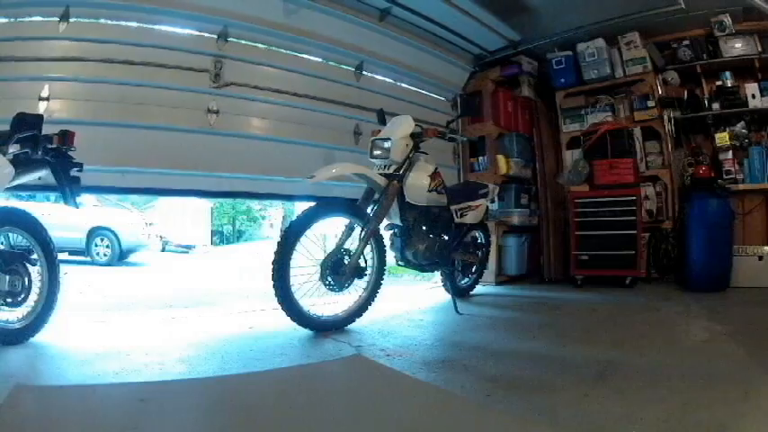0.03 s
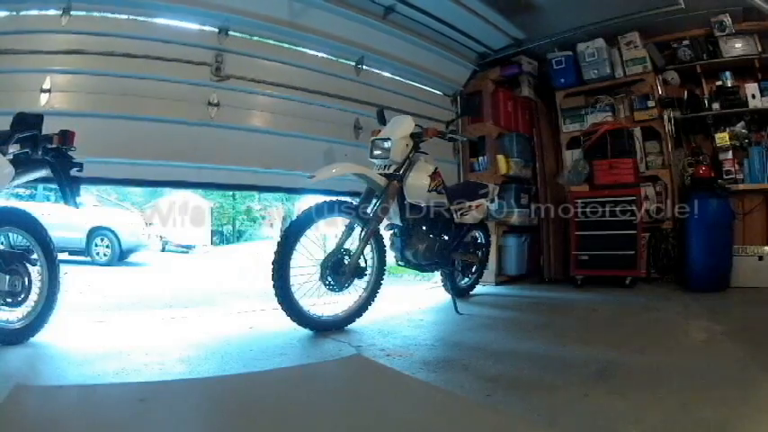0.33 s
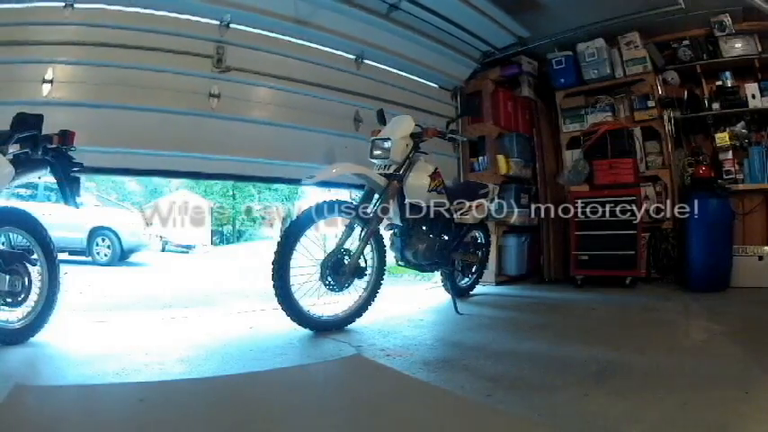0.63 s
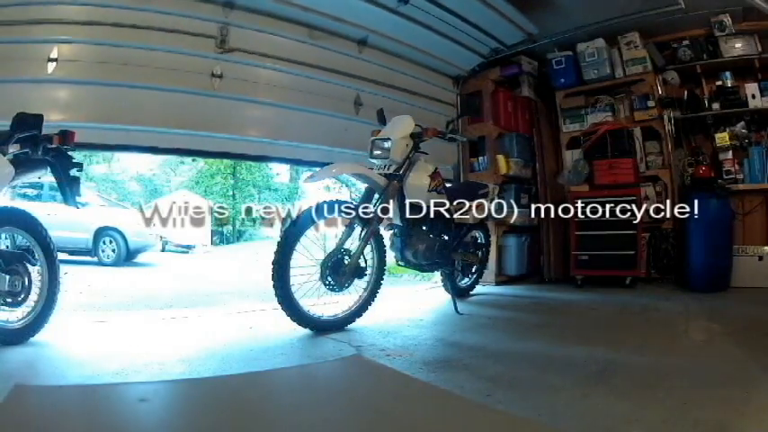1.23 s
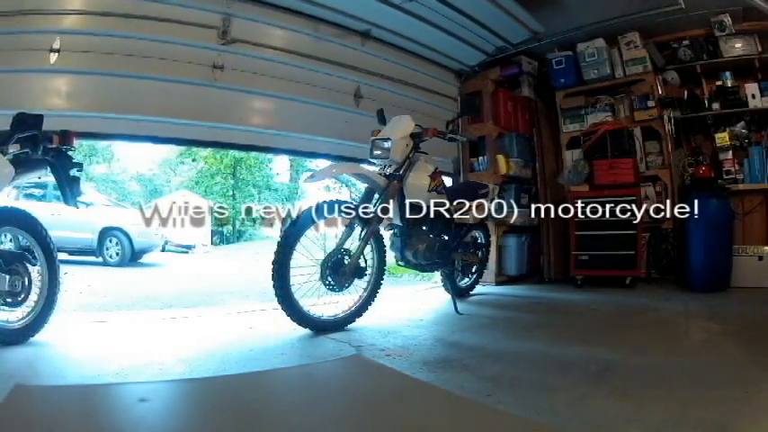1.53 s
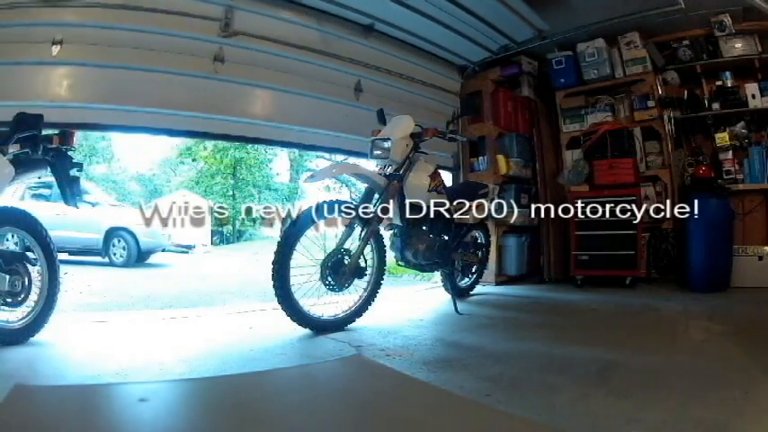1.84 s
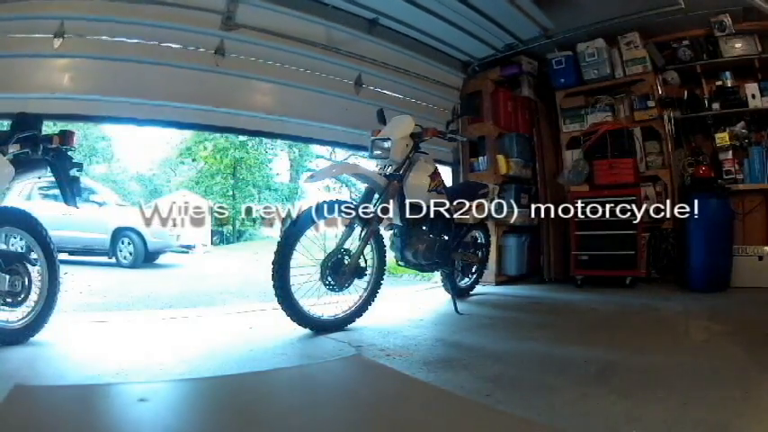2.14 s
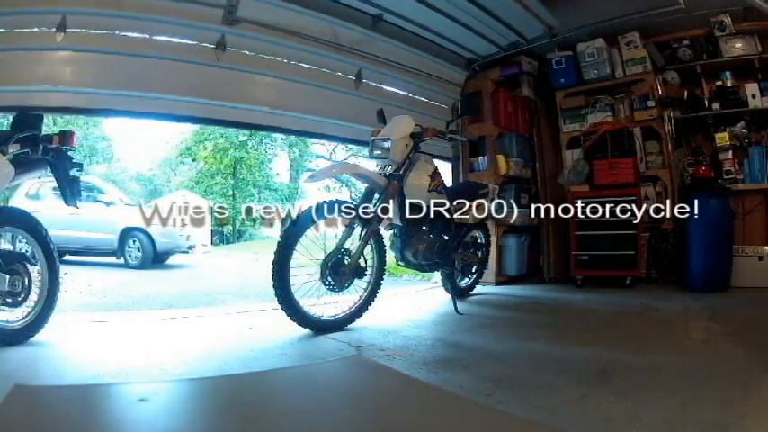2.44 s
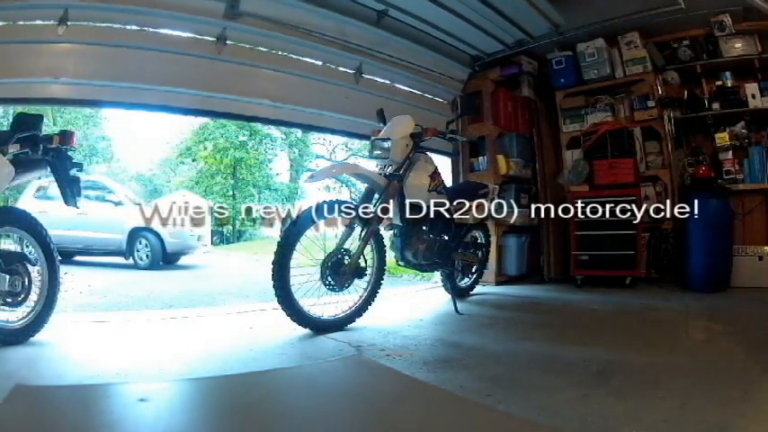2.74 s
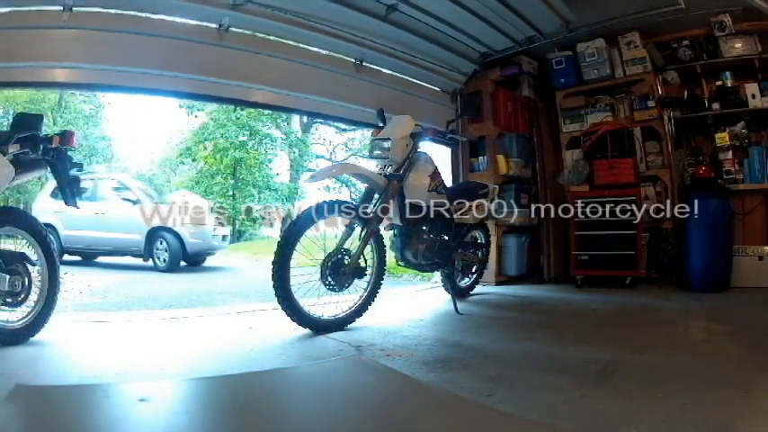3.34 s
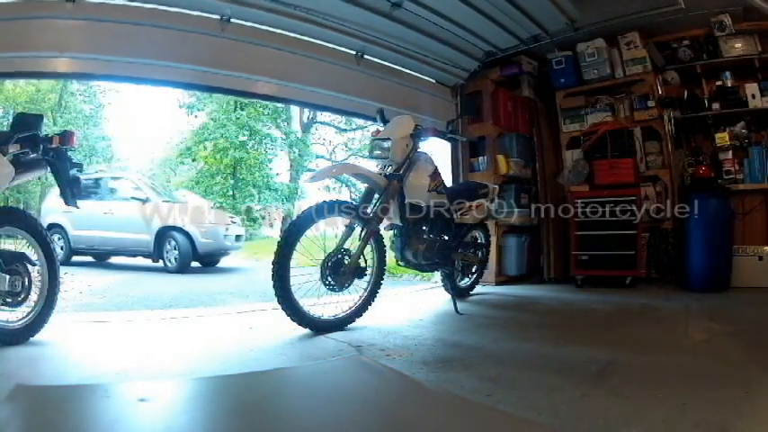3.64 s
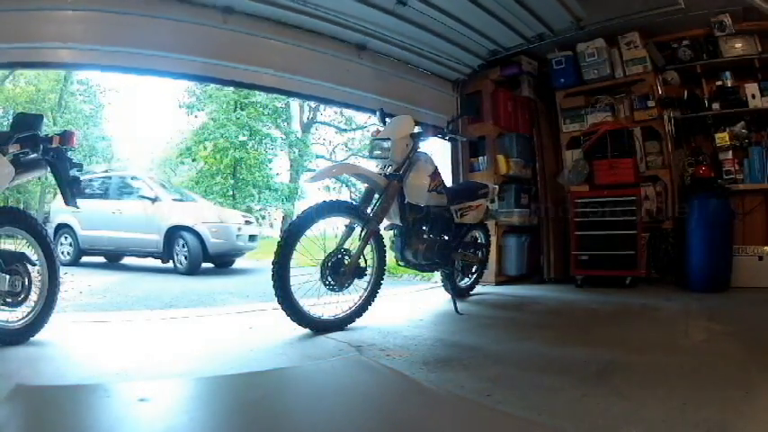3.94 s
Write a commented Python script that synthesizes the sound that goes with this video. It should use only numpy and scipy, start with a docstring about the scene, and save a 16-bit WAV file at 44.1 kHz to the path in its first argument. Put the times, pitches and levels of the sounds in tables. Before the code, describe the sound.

A motorized garage door rises for the whole four seconds, heard from inside with a short echo. The motor hums under rumbling panels and light chain chatter. Loose metal parts rattle on and off, most strongly between about 0.3 and 1.4 seconds. Near 2.8 seconds a dry roller scrapes upward in pitch into a brief squeak. From about 3.2 seconds the track rings faintly on one wavering tone.

```python
"""A garage door opening

An electric opener lifts a sectional door, heard from inside the garage. The motor hums at
twice the mains frequency and the rollers rumble through the panels. Hinges and track rattle,
one dry roller squeaks, and near the top the track sings. A low, held sample rate mirrors
the sound faintly into the treble."""
import sys
import numpy as np
from scipy import signal
from scipy.fft import rfft, irfft
from scipy.io import wavfile

SR = 44100
rng = np.random.default_rng(int(sys.argv[2]) if len(sys.argv) > 2 else 0)


def unload_audio(sound):
    """Save the sound as a 16-bit wav file, at the path given as the first command line argument."""
    columns = np.transpose(np.atleast_2d(sound))
    # keep every value between -1 and 1, then stretch to whole-number steps
    steps = np.round(np.clip(columns, -1, 1) * 32767)
    wavfile.write(sys.argv[1], SR, steps.astype(np.int16))


N = 176400
T = np.arange(N) / SR

HUM_HZ = 120.1  # twice the mains frequency
# How the hum's harmonics at 1, 2 and 4 times its pitch rise and fall: t/s, level/dB
FIRST_HARMONIC = [(0, -36.5), (.3, -35.5), (.42, -38), (.6, -33), (.82, -42), (1.0, -39), (1.1, -47),
                  (1.4, -48.5), (1.9, -46.5), (2.2, -49), (2.42, -38), (2.7, -59), (2.94, -34), (3.05, -55),
                  (3.2, -38), (3.6, -47), (4, -60)]
SECOND_HARMONIC = [(0, -56), (.5, -52.5), (.75, -46), (1.3, -50.5), (2.3, -54), (2.9, -49), (3.5, -48),
                   (4, -51)]
FOURTH_HARMONIC = [(0, -41.5), (.3, -42), (.42, -51), (.58, -52), (.68, -42), (.82, -48), (1.1, -51.5),
                   (1.27, -42), (1.62, -50), (2.03, -43.5), (2.22, -51.5), (2.4, -43.5), (2.62, -45.5),
                   (2.9, -50), (3.28, -48), (3.5, -49.5), (4, -49)]
# The level near 360 Hz, the hum's third harmonic plus a brief panel ring near 2.9 s: t/s, level/dB
LEVEL_NEAR_360_HZ = [(0, -40), (.35, -37.5), (.42, -43.5), (.55, -74), (.7, -41.5), (.88, -42), (.98, -39),
                     (1.15, -43.5), (1.36, -46), (1.44, -44.5), (1.58, -39.5), (1.68, -52), (1.85, -41.5),
                     (2.45, -40.5), (2.7, -42), (2.8, -46), (2.92, -40.5), (3.05, -53), (3.3, -44),
                     (3.6, -63), (4, -44)]
# How the higher harmonics rise and fall together: t/s, level/dB
UPPER_LEVEL = [(0, -42.5), (.27, -39.5), (.42, -51), (.56, -49), (.64, -42), (.8, -42), (1.05, -47),
               (1.25, -47), (1.75, -50.5), (2, -48), (2.25, -52.5), (2.5, -44), (2.75, -59), (3.3, -53),
               (4, -50.5)]
# Each higher harmonic: multiple of the hum's pitch, added level/dB, random wander/dB
UPPER_HARMONICS = [(5, -6.5, 6), (6, 0, 0)]

def motor():
    """The hum swells with the load and shakes with each turn of the shaft; a panel rings briefly."""
    tones = [(1, in_time(FIRST_HARMONIC)[0] - 4.5),
             (2, in_time(SECOND_HARMONIC)[0]),
             (3, in_time(LEVEL_NEAR_360_HZ)[0] + drift(31)),
             (4, in_time(FOURTH_HARMONIC)[0])]
    upper_db = in_time(UPPER_LEVEL)[0]
    for multiple, db, wander_db in UPPER_HARMONICS:
        tones.append((round(multiple), upper_db + db + wander_db * np.tanh(drift(1.4))))
    shaft = 1 + 0.084 * tone(hz=28.74, waver=1.0)
    return shaft * sum(from_db(db) * tone(multiple * HUM_HZ, waver=0.3) for multiple, db in tones)


# How hard the rollers shake the panels: t/s, rumble level/dB, drone level/dB
PANEL_LEVELS = [(0, -45.5, -45.5), (.3, -49, -48), (.52, -47, -46.5), (.65, -43, -44.5), (.82, -45, -45.5),
                (1.1, -43.5, -43.5), (1.5, -46, -47), (1.75, -43.5, -44), (2.2, -44.5, -43.5),
                (2.6, -43.5, -44.5), (2.95, -41.5, -41), (3.15, -44, -46), (3.35, -42.5, -45.5),
                (3.7, -44.5, -46), (4, -45.5, -44.5)]
# The tone colour of the panels' deep rumble and of their higher drone: f/Hz, level/dB
RUMBLE_COLOUR = [(30, -29), (45, -7.5), (62, -1.5), (78, 2), (105, 6), (150, 0), (200, -1), (270, 4),
                 (350, 5.5), (410, 1.5), (470, -2), (700, -49)]
DRONE_COLOUR = [(300, -24.5), (430, -8.5), (500, -7), (545, -2), (660, 1.5), (750, 1.5), (850, -4.5),
                (1000, -15.5), (1300, -43.5), (2000, -48.5)]
# The slow shudder of the whole door: t/s, level/dB
SHUDDER_LEVEL = [(0, -60), (.7, -59), (1.1, -52.5), (2.3, -53), (3.3, -52), (4, -68)]

def panels():
    """Rollers bump along the track and shake the door panels."""
    rumble_db, drone_db = in_time(PANEL_LEVELS)
    bumps = rms_one(clicks(per_s=700, spread_db=2.2) + rng.standard_normal(N))
    bumps *= from_db(1.1 * drift(5.1))  # the rolling is uneven
    shudder = from_db(in_time(SHUDDER_LEVEL)[0] + 2 * drift(15)) * tone(hz=34.8, waver=1.0)
    rumble = from_db(rumble_db + 3) * body(bumps, RUMBLE_COLOUR)
    drone = from_db(drone_db + 0.5) * body(bumps, DRONE_COLOUR)
    return rumble + drone + shudder


# One rattle of a hinge or roller a row: t/s, length/s, level/dB, f/Hz, knock against clatter/dB
LOOSE_PARTS = [ (.322, .012, -49, 2000, -3), (.347, .018, -44, 2150, 2), (.604, .045, -44, 2650, 6),
               (.965, .035, -42.5, 3400, -2), (1.075, .02, -41.5, 4600, -3), (1.112, .016, -43, 2200, -2),
               (1.278, .02, -44.5, 4200, -2), (1.304, .03, -41.5, 2550, 4), (1.406, .024, -46, 1950, 1),
               (2.509, .016, -43.5, 2950, -3), (3.221, .003, -50, 3700, -6), (3.319, .012, -47.5, 2100, 2),
               (3.344, .018, -51, 2700, 0), (3.418, .026, -46, 3350, -3), (3.595, .025, -47, 1950, -1),
               (3.766, .014, -44, 1950, -3), (0.779, 0.048, -51, 2080, 11), (1.709, 0.023, -51, 1480, 12.5),
               (1.85, 0.013, -53, 3500, 6), (2.11, 0.022, -51.5, 2000, -7), (2.387, 0.023, -47, 2550, -10),
               (2.471, 0.031, -50, 2240, 8), (2.57, .012, -51, 2880, -3), (2.654, 0.022, -53, 2820, 13),
               (2.777, 0.02, -53, 1680, -1), (2.835, 0.04, -52, 2830, -2), (2.882, 0.042, -49.5, 3300, 0.5),
               (3.634, 0.022, -58.5, 1940, 22.5)]

def rattles():
    """A loose steel part strikes, clatters briefly around its own pitch and knocks the panels."""
    hits = clicks(per_s=310, spread_db=2) + rng.standard_normal(N)
    clatter = steel(hits)
    knock = rms_one(body(hits, DRONE_COLOUR) + from_db(-4) * body(hits, RUMBLE_COLOUR))
    out = 0
    for start, length, db, hz, knock_db in LOOSE_PARTS:
        age = np.maximum(T - start, 0)
        first_blow_db = 3 * np.exp(-age / .008)
        level_db = db + first_blow_db - 60 * age  # sinks 60 dB a second
        flurry = burst(start, length, attack_s=.003, release_s=.005) * from_db(level_db)
        band = signal.butter(2, [hz / 1.19, hz * 1.19], "band", fs=SR, output="sos")
        part_ring = from_db(-1) * rms_one(signal.sosfilt(band, hits))
        out += flurry * (rms_one(clatter + part_ring) + from_db(knock_db) * knock)
    return garage(out)


# The dry roller's scrape, climbing in pitch: t/s, f/Hz, level/dB
SCRAPE_PATH = [(2.78, 2150, -70), (2.815, 2400, -50), (2.86, 2650, -53), (2.9, 2900, -52),
               (2.93, 3100, -54), (2.96, 3300, -56), (3.02, 3350, -61), (3.06, 3350, -80)]
# Its short squeaks: t/s, length/s, level/dB
SQUEAK_TIMES = [(2.942, 0.014, -40.5), (2.972, 0.023, -51.5)]
# The tones that make up a squeak: f/Hz, level/dB
SQUEAK_TONES = [(3160, -9.5), (3298, 0), (3342, -3), (3440, -3), (3524, -6)]

def dry_roller():
    """A dry roller sticks and slips, its pitch jumping about as it climbs into a squeak."""
    slips_per_s, jump_hz, width_hz = 43, 380, 220
    scrape_hz, scrape_db = in_time(SCRAPE_PATH)
    phase = 2 * np.pi * np.cumsum(scrape_hz + jump_hz * np.tanh(drift(slips_per_s))) / SR
    slips = from_db(6 * tone(slips_per_s, waver=2.9))
    pitched_noise = drift(width_hz) * np.sin(phase) + drift(width_hz) * np.cos(phase)
    scrape = from_db(scrape_db) * rms_one(slips * pitched_noise)
    rub = sum(from_db(db) * burst(start, length, attack_s=.0072, release_s=.0041)
              for start, length, db in SQUEAK_TIMES)
    squeak = sum(from_db(db) * tone(hz, waver=2.8) * from_db(6.9 * np.clip(drift(110), -2, 2))
                 for hz, db in SQUEAK_TONES)
    friction = scrape + rub * rms_one(squeak)
    return .5 * (garage(friction) + friction)


# The steady chatter of chain and rollers: t/s, level/dB
CHATTER_LEVEL = [(0, -46.5), (.3, -49.5), (.55, -50.5), (.7, -47.5), (1.35, -48), (1.52, -51.5), (2.3, -50),
                 (2.5, -48.5), (2.9, -49.5), (3.1, -52.5), (3.6, -50.5), (4, -52)]

def chatter():
    """Chain and rollers tick lightly over a rolling hiss that buzzes with the motor."""
    hiss = rng.standard_normal(N) * (1 + 0.084 * tone(HUM_HZ, waver=1.0))
    ticks = garage(clicks(per_s=600, spread_db=2.5) * from_db(1.3 * drift(40)))
    return from_db(in_time(CHATTER_LEVEL)[0]) * steel(ticks + from_db(-3) * hiss)


# The tone colour of a clack on steel: f/Hz, level/dB
CLACK_COLOUR = [(600, 15), (1000, 10.5), (1400, 6.5), (1800, 4), (1970, 6), (2300, 5.5), (2900, -0.5),
                (3600, 1.5), (4400, -4), (5400, -10)]
# The tones of the struck track: f/Hz, level/dB, time to fade by 60 dB/s
TRACK_TONES = [(1160, -8, 0.71), (1970, -6, 0.04), (2050, 8, 0.03), (2850, 8, 0.015), (2970, 12, 0.013),
               (4080, -4, 0.024)]

def steel(hits):
    """Each hit on hinges and track gives a broad clack and a short ring."""
    t = T[:SR // 4]
    ring = sum(from_db(db - 60 * t / fade_s) * np.sin(2 * np.pi * hz * t)
               for hz, db, fade_s in TRACK_TONES)
    return body(hits, CLACK_COLOUR) + from_db(-13) * rms_one(signal.fftconvolve(hits, ring)[:N])


# How the track's singing comes and goes: t/s, level/dB
SINGING_LEVEL = [(3.1, -88), (3.22, -57.5), (3.4, -69), (3.62, -49.5), (3.78, -71), (3.9, -52.5), (4, -52)]

def singing_track():
    """Near the top of the travel, the roller sets the track singing on one wavering note."""
    level_db = in_time(SINGING_LEVEL)[0] + 3.2 * np.tanh(drift(25))
    return from_db(level_db) * tone(hz=957, waver=2.1)


def garage(x):
    """The garage adds a dense, dying tail of echoes; the overall level stays about the same."""
    t = T[:SR // 2]
    fade_s, echo_gain = 0.37, from_db(1.5)
    tail = rng.standard_normal(len(t)) * from_db(-60 * t / fade_s) * (t > .003)
    echoes = signal.fftconvolve(x, tail / np.linalg.norm(tail))[:N]
    return (x + echo_gain * echoes) / np.hypot(1, echo_gain)


def body(x, colour):
    """A shaken object gives the sound its own tone colour; the result has level one."""
    hz, db = np.transpose(colour)
    grid_hz = np.maximum(np.fft.rfftfreq(N, 1 / SR), 1)
    gains = from_db(np.interp(np.log(grid_hz), np.log(hz), db))
    # Folding the cepstrum (the log spectrum, turned into time) puts all ringing after the hit.
    cepstrum = irfft(np.log(gains), N)
    cepstrum[1:N // 2] *= 2
    cepstrum[N // 2 + 1:] = 0
    one_tap = irfft(np.exp(rfft(cepstrum)), N)[:N // 8]
    return rms_one(irfft(rfft(x, 2 * N) * rfft(one_tap, 2 * N))[:N])


def clicks(per_s, spread_db):
    """Tiny hits at random times and of uneven strength."""
    sizes = from_db(spread_db * np.clip(rng.standard_normal(N), -2, 2)) * rng.choice([-1, 1], N)
    return rms_one(sizes * (rng.random(N) < per_s / SR))


def tone(hz, waver):
    """A sine wave of level one whose phase wanders by about `waver` radians."""
    return np.sqrt(2) * np.sin(2 * np.pi * (hz * T + rng.random()) + waver * drift(3.8))


def drift(rate_hz):
    """A smooth random wander of about size one; a higher rate wanders faster."""
    step, warm_up = 40, 2000
    pole = np.exp(-2 * np.pi * step * rate_hz / SR)
    noise = rng.standard_normal(N // step + warm_up + 2)
    slow = signal.lfilter([1], [1, -2 * pole, pole * pole], noise)[warm_up:]
    return np.interp(np.arange(N) / step, np.arange(len(slow)), rms_one(slow))


def burst(start, length, attack_s, release_s):
    """A loudness shape that rises, holds and dies away."""
    rise = np.clip((T - start) / attack_s, 0, 1)
    return rise * np.exp(-np.maximum(T - start - length, 0) / release_s)


def in_time(rows):
    """Join a table's rows with straight lines: one curve for each column after the time."""
    times, *columns = np.transpose(rows)
    return [np.interp(T, times, column) for column in columns]


def from_db(db):
    """Turn decibels into a number to multiply by."""
    return 10 ** (np.asarray(db) / 20)


def rms_one(x):
    """Scale a sound so that its average (RMS) level is one."""
    return x / np.sqrt(np.mean(x ** 2) + 1e-20)


def scene():
    """Everything as heard from the garage floor, in one channel."""
    return (motor() + panels() + chatter() + rattles() + dry_roller() + singing_track())[None]


def record(dry):
    """The sound cuts in and is dulled; held samples mirror it into the treble, and the top is cut."""
    start_s, hold_hz = .035, 12000
    input_filter = signal.ellip(8, .5, 70, 5450, fs=SR, output="sos")
    mirror_filter = signal.butter(1, 4850, fs=SR, output="sos")
    top_filter = signal.ellip(10, .2, 80, 15100, fs=SR, output="sos")
    dulled = signal.sosfilt(input_filter, dry * (T > start_s))
    steps = np.gradient(dulled, axis=-1) * 2 * np.sin(2 * np.pi * hold_hz * T)
    mirror = from_db(5.5) * signal.sosfilt(mirror_filter, steps)
    return signal.sosfilt(top_filter, dulled + mirror)


dry = scene()
out = record(dry)
unload_audio(out)
```